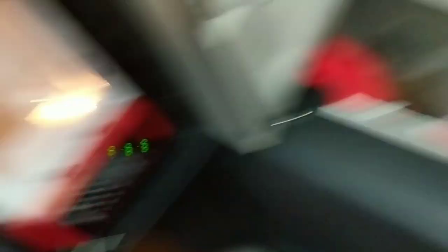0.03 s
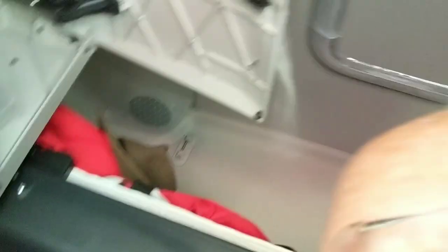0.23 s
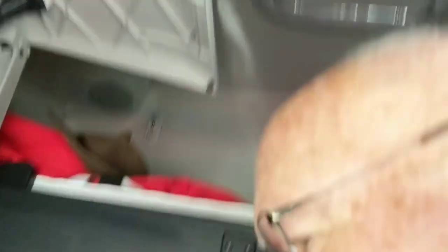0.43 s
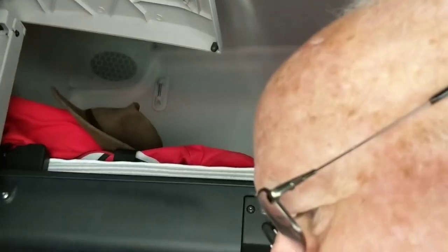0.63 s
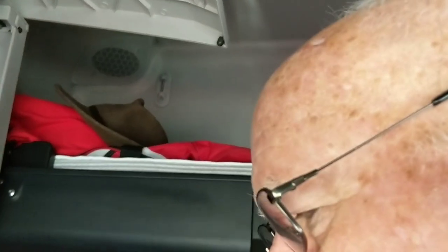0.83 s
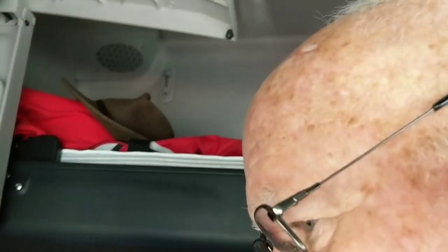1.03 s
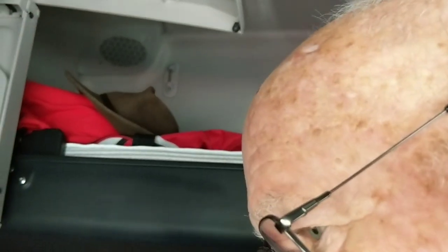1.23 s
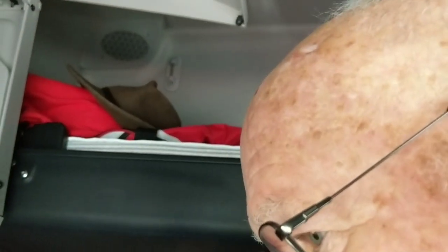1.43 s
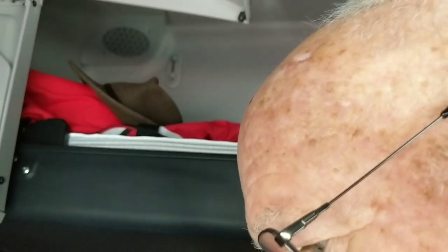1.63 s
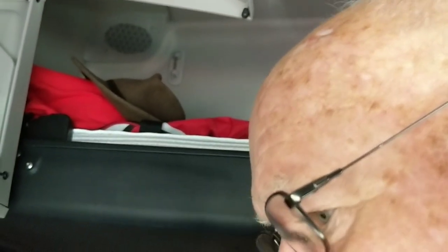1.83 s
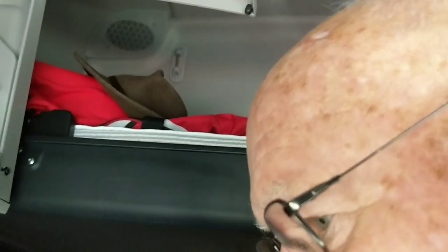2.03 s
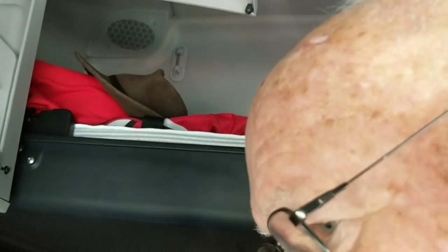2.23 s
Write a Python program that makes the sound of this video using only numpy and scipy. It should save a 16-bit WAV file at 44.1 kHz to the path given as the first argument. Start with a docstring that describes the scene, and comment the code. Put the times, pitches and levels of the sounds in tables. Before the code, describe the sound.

A diesel truck engine idles with a deep steady hum inside the cab, paper plate rustling close by

```python
"""You hear a deep, steady diesel idle inside a small padded truck cab, with a paper plate handled close by.
The idle is a stack of cosine harmonics: a thump, then a boom of the cab panels, under a thin clatter.
Muffled combustion noise pulses with it, over steady noises for rumble and hiss and a wash that swells.
The plate gives a sharp snap and tiny ticks (short rings), two scrapes and soft brushes (shaped noise),
dull taps (ringing modes) and low bumps as it bends."""
import sys
import numpy as np
from scipy import signal
from scipy.fft import rfft, irfft
from scipy.io import wavfile

SR = 44100
rng = np.random.default_rng(int(sys.argv[2]) if len(sys.argv) > 2 else 0)


def dump_mix(stems):
    """Bounce the given channels to the path in sys.argv[1] as a 16-bit WAV at rate SR."""
    frames = np.atleast_2d(stems).T  # one column per channel
    limited = np.clip(frames, -1, 1)  # hard clip at full scale
    pcm = np.round(limited * 32767).astype(np.int16)
    wavfile.write(sys.argv[1], SR, pcm)


N = 100239  # length in samples
T = np.arange(N) / SR  # time in seconds

# In every colour table, each row: frequency in Hz, relative noise level in dB per Hz.
# Colour of the low rumble of the cab.
RUMBLE_COLOUR = [(10, -5.5), (25, 9), (60, 9), (110, -7.5), (170, -6), (250, -5), (400, -16.5), (900, -50)]
RUMBLE_DB = -48.5
# Mid-range wash that swells and recedes as the microphone turns. Each row: time in seconds, level in dB.
WASH_LEVEL = [(0, -72), (.45, -70), (.8, -66.5), (1.2, -72.5), (1.55, -68.5), (1.8, -72), (2.27, -70.5)]
# Colour of the wash.
WASH_COLOUR = [(300, -16), (600, -5.5), (850, 1.5), (1200, -2.5), (1600, -16), (3000, -38)]
# Colour of the faint steady hiss, before its lows are cut.
HISS_COLOUR = [(880, -43), (1500, 1.5), (1700, -2.5), (2540, -3.5), (3910, -8.5), (5240, -11), (6310, -12),
               (15500, -19.5)]
HISS_DB, HISS_LOW_CUT_HZ = -72.5, 1050  # level is set before the cut

# Soft brushes over the paper. Each row: middle in seconds, half length in seconds, level in dB,
# share of fine fizz in the power from 0 to 1.
BRUSHES = [(0.437, 0.033, -66.5, 0.3), (0.517, 0.024, -65, 0.9), (0.638, 0.011, -67, 0.25),
           (0.678, 0.013, -69, 0.44), (.745, 0.02, -68.5, 0.26), (0.811, 0.014, -66.5, 0.34),
           (0.876, 0.017, -61.5, 0.13), (0.943, 0.02, -72.5, 0.3), (1.142, 0.008, -65, 0.2),
           (1.208, 0.018, -60, .1), (1.317, 0.017, -67, 0.37), (1.394, 0.029, -65, 0.09),
           (1.62, .025, -74, .5), (1.727, 0.0084, -64.5, .15), (1.83, .025, -71.5, 0.2),
           (1.92, 0.02, -66.5, 0.04), (2.067, 0.014, -67.5, 0), (2.241, 0.0031, -61, .2),
           (2.268, 0.008, -64.5, 0.3)]
# Colour of the dull rubbing in a brush.
DULL_COLOUR = [(500, -3), (1400, 4), (1900, -0.5), (2500, 2.5), (3400, 0), (4300, -8.5), (5300, -3.5),
               (7000, -26.5), (15000, -39)]
# Colour of the fine fizz in a brush.
FIZZ_COLOUR = [(2000, -9), (6200, -9), (8200, -4.5), (10000, -7.5), (12500, -12), (15500, -18)]

# Ways the plate rings. Each row: frequency in Hz, starting level in dB, time to fade by 60 dB in seconds.
PLATE_MODES = [(1440, -8.5, 0.0076), (2214, -4, 0.02), (2500, -4.5, 0.018), (3070, -4.5, .012),
               (3660, -5, 0.0087), (5040, -8, 0.0046)]
# Dull taps of a finger on the plate. Each row: time in seconds, strength of the blow in dB.
TAPS = [(.594, -55.5), (1.199, -61), (1.512, -54), (1.539, -49), (1.8045, -57), (2.237, -55.5)]
# The plate flexes under the longest scrape. Each row: start in seconds, level in dB before the fades.
FLEXES = [(1.507, -42), (1.536, -41.5), (1.5574, -44)]
FLEX_HZ, FLEX_FADE_S = 175, .025

# Scrapes of fingers on the plate. Each row: peak in seconds, rise in seconds, fall in seconds,
# level in dB of the body without its ring, fine grit against that body in dB.
SCRAPES = [(1.478, .008, 0.018, -60.5, 0), (1.514, 0.007, 0.0041, -58, -4.5),
           (1.539, 0.015, 0.023, -52.5, -4), (1.557, 0.0034, 0.0099, -59.5, 3),
           (1.582, .006, 0.016, -60.5, 0.5), (1.795, .002, 0.0035, -57.5, -2),
           (1.804, .004, 0.0099, -55.5, 1.5)]
# Colour of the plate's body in a scrape.
SCRAPE_COLOUR = [(450, 1), (1200, -10.5), (1850, -11.5), (2200, 4), (2600, 1.5), (3200, -1.5), (4200, -10),
                 (6500, -12), (12000, -38)]
# Colour of the fine grit in a scrape.
GRIT_COLOUR = [(3000, -16), (6000, -7), (8800, 1), (11500, -1), (13500, -12), (15500, -9.5)]
GRAINS_PER_S, GRAIN_SPREAD_DB = 4000, 2.5
STICK_SLIP_HZ, STICK_SLIP_DB = 160, 1  # speed and typical depth of the random clumping
SCRAPE_RING_DB = -4  # the ringing modes against the body

# Snaps and ticks of the plate's rim. Each row: time in seconds, peak level in dB, ring frequency in Hz.
TICKS = [(.4453, -23.5, 6750), (0.4465, -32, 7400), (.5355, -52, 7000), (.656, -60, 12000),
         (.684, -61, 11500), (1.0129, -50, 9800), (1.1396, -55, 3930), (1.1975, -46, 5500),
         (1.326, -47, 7850), (1.48, -47, 9000), (1.5069, -45, 10500), (1.534, -41, 9500),
         (1.545, -41, 9300), (1.583, -43, 9000), (1.6815, -55, 11500), (1.8037, -38, 11300),
         (1.813, -40, 9250)]
TICK_RING_S, TICK_TOP_HZ = 0.0003, 12800
TICK_CRACK = 1.2  # height of the instant crack against the ring

CAB_T60_S, CAB_DB = 0.05, -12.5  # fade by 60 dB, and level of the reflections

# Colour of the combustion noise heard through the firewall.
KNOCK_COLOUR = [(150, 4.5), (300, -6), (420, -0.5), (500, 0), (620, -2), (800, -11.5), (1100, -17.5),
                (1600, -33.5), (3000, -38)]
KNOCK_DB, KNOCK_DEPTH = -58, 0.64
KNOCK_PEAK_S = .023  # time of a peak in the pulsing

IDLE_HZ = 18.98  # engine cycles per second
# Engine harmonics. Each row: multiple of the idle rate, level in dB before the gain of its band.
HARMONICS = [(1, -1), (2, -4), (3, -4), (4, -21.5), (5, -10), (6, -26), (7, -2), (8, -6.5), (9, -42),
             (10, -38.5), (11, -34), (12, -12.5), (13, -18.5), (14, -42), (15, -25.5), (16, -41), (17, -30),
             (18, -30.5), (19, -26.5), (20, -30), (21, -24.5), (22, -31.5), (23, -31.5), (24, -28),
             (25, -38.5), (26, -53), (27, -32), (28, -45.5), (29, -40.5), (30, -27.5), (31, -44.5),
             (32, -34), (33, -39), (34, -40), (35, -38), (36, -37), (37, -39.5), (38, -46), (39, -40),
             (40, -47), (41, -47.5), (42, -39), (43, -44.5), (44, -45.5), (45, -44.5), (46, -50),
             (47, -43.5), (48, -42)]
# The deep thump and the cab panels that answer it. Each row: top of the band in Hz, lag in seconds,
# gain in dB, typical waver of that gain from 0 to 1.
PANELS = [(85, 0.0013, -36.5, 0), (106, 0.01942, -36, 0.06), (180, .0228, -36.5, 0.05),
          (295, .0174, -35.5, 0.03)]
FIRST_THUMP_S = .0163  # before the lag of each band
WANDER_S = .00012  # typical unevenness of the timing
CLATTER_DB, CLATTER_WAVER = -37, 0.22  # gain of the highest harmonics, and its unevenness

EDGE_HZ = 15600  # top of the recorder's band


def amp(db):
    """Turns decibels into a gain."""
    return 10 ** (np.asarray(db) / 20)


def unit(x):
    """Scales a sound to an average (rms) level of 1."""
    return x / np.sqrt(np.mean(x ** 2) + 1e-20)


def colour(x, points):
    """Filters x by a curve drawn on a log-frequency axis, then sets its rms to 1."""
    hz, db = np.transpose(points)
    bin_hz = np.fft.rfftfreq(N, 1 / SR)
    curve_db = np.interp(np.log(bin_hz + 1), np.log(hz), db)  # + 1 avoids log(0)
    return unit(irfft(rfft(x) * amp(curve_db), N))


def noise(points):
    """Makes steady coloured noise with an rms of 1."""
    return colour(rng.standard_normal(N), points)


def drift(rate_hz):
    """Makes random motion with an rms of 1, by smoothing away changes much faster than rate_hz."""
    smoothing = np.exp(-(np.fft.rfftfreq(N, 1 / SR) / rate_hz) ** 2)
    return unit(irfft(rfft(rng.standard_normal(N)) * smoothing, N))


def grains(per_s, spread_db):
    """Scatters tiny slips of uneven size at random times."""
    happens = rng.random(N) < per_s / SR
    boost_db = spread_db * np.minimum(rng.exponential(1, N), 3)
    return rng.standard_normal(N) * happens * amp(boost_db)


def rumble():
    """The low rumble of the cab is steady coloured noise."""
    return amp(RUMBLE_DB) * noise(RUMBLE_COLOUR)


def wash():
    """A soft mid-range noise swells and recedes as the microphone turns."""
    level_db = np.interp(T, *np.transpose(WASH_LEVEL))
    return amp_line(level_db) * noise(WASH_COLOUR)


def wash():
    """A soft mid-range noise swells and recedes as the microphone turns."""
    times, levels_db = np.transpose(WASH_LEVEL)
    return amp(np.interp(T, times, levels_db)) * noise(WASH_COLOUR)


def hiss():
    """A faint steady hiss is coloured noise with its lows cut."""
    low_cut = signal.butter(2, HISS_LOW_CUT_HZ, "high", fs=SR, output="sos")
    return amp(HISS_DB) * signal.sosfilt(low_cut, noise(HISS_COLOUR))


def brushes():
    """Light touches swell and fade, each a blend of dull rubbing and fine fizz."""
    dull = noise(DULL_COLOUR)
    fizz = colour(grains(per_s=6000, spread_db=0.0), FIZZ_COLOUR)
    out = np.zeros(N)
    for middle, half, db, share in BRUSHES:
        share = np.clip(share, 0, 1)
        swell = np.exp(-.5 * ((T - middle) / half) ** 2)
        blend = np.sqrt(1 - share) * dull + np.sqrt(share) * fizz
        out += amp(db) * swell * blend
    return out


def plate(x):
    """Lets x strike the plate, whose modes ring as fading sines."""
    t = T[:2048]
    ring = sum(amp(db - 60 * t / t60) * np.sin(2 * np.pi * hz * t) for hz, db, t60 in PLATE_MODES)
    return signal.fftconvolve(x, ring)[:N]


def taps():
    """A fingertip knocks softly: each single-sample blow sets the plate ringing."""
    blows = np.zeros(N)
    for start, db in TAPS:
        blows[round(start * SR)] = amp(db)
    return plate(blows)


def flexes():
    """The bending plate gives a soft, low bump: a sine that rises quickly and fades."""
    out = np.zeros(N)
    for start, db in FLEXES:
        age = np.maximum(T - start, 0)
        rise = 1 - np.exp(-age * FLEX_HZ)
        fade = np.exp(-age / FLEX_FADE_S)
        out += amp(db) * rise * fade * np.sin(2 * np.pi * FLEX_HZ * age)
    return out


def scrapes():
    """Fingers stick and slip over the plate; clumps of grains ring its body under a fine grit."""
    clumping = amp(STICK_SLIP_DB * drift(STICK_SLIP_HZ))
    slips = grains(GRAINS_PER_S, GRAIN_SPREAD_DB) * clumping
    body = colour(slips, SCRAPE_COLOUR) + amp(SCRAPE_RING_DB) * unit(plate(slips))
    grit = colour(slips, GRIT_COLOUR)
    out = np.zeros(N)
    for peak, rise, fall, db, grit_db in SCRAPES:
        shape = np.exp(-np.maximum((peak - T) / rise, (T - peak) / fall))
        out += amp(db) * shape * (body + amp(grit_db) * grit)
    return out


def ticks():
    """The stiff rim snaps: an instant crack and a ring of a few cycles."""
    out, t = np.zeros(N), T[:256]
    for start, db, hz in TICKS:
        ring = np.cos(2 * np.pi * hz * t) * np.exp(-t / TICK_RING_S)
        crack = TICK_CRACK * (t == 0)
        band = signal.butter(2, [hz / 2, TICK_TOP_HZ], "band", fs=SR, output="sos")
        tick = signal.sosfilt(band, ring + crack)
        part = out[round(start * SR):][:len(t)]  # a view, so adding to it changes out
        part += amp(db) * tick[:len(part)] / abs(tick).max()
    return out


def cab(x):
    """Adds the short, soft reflections of the padded cab, as a fading tail of noise."""
    t = T[:SR // 5]
    fade = np.exp(-np.log(1000) * t / CAB_T60_S)
    tail = rng.standard_normal(len(t)) * (t > .002) * fade  # the first reflections come after 2 ms
    return x + amp(CAB_DB) * signal.fftconvolve(x, tail / np.linalg.norm(tail))[:N]


def knock():
    """Muffled combustion noise swells twice in every engine cycle."""
    swell = 1 + KNOCK_DEPTH * np.cos(2 * np.pi * 2 * IDLE_HZ * (T - KNOCK_PEAK_S))
    return amp(KNOCK_DB) * unit(swell * noise(KNOCK_COLOUR))


def engine():
    """Each band of panels answers the thump as one pulse; the highest harmonics scatter as clatter."""
    clock = T - FIRST_THUMP_S + WANDER_S * drift(rate_hz=11.6)
    bands = []
    for top_hz, lag, db, waver in PANELS:
        bands.append((top_hz, lag, amp(db) * (1 + waver * drift(rate_hz=18))))
    out = np.zeros(N)
    for multiple, db in HARMONICS:
        hz = multiple * IDLE_HZ
        for top_hz, lag, gain in bands:
            if hz < top_hz:
                break  # keep the lag and gain of the first band that holds this harmonic
        else:  # above every band: clatter, with a random lag and its own waver
            lag = rng.random() / IDLE_HZ
            gain = amp(CLATTER_DB) * (1 + CLATTER_WAVER * drift(rate_hz=16))
        out += np.sqrt(2) * amp(db) * gain * np.cos(2 * np.pi * hz * (clock - lag))
    return out


def scene():
    """Mixes the cab's background, the plate and the idling engine at one microphone."""
    background = rumble() + wash() + hiss()
    handling = cab(brushes() + taps() + scrapes() + ticks())
    return (background + handling + flexes() + knock() + engine())[None]


def record(dry):
    """Removes what lies above the recorder's band with a steep low-pass filter."""
    low_pass = signal.firwin(401, EDGE_HZ, window=("kaiser", 9), fs=SR)
    margin = len(low_pass) // 2
    padded = np.pad(dry, ((0, 0), (margin, margin)), "reflect", reflect_type="odd")
    return signal.oaconvolve(padded, low_pass[None], "valid")


dry = scene()
out = record(dry)
dump_mix(out)
```